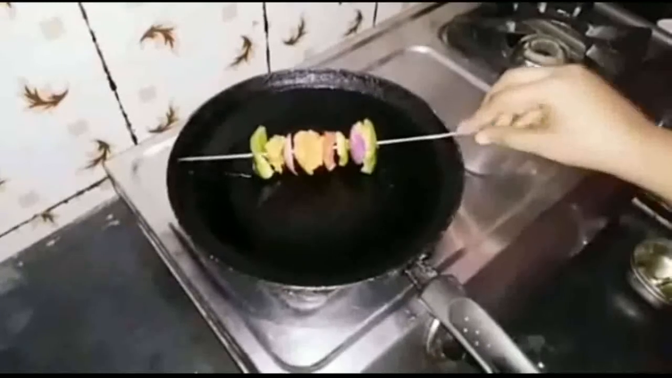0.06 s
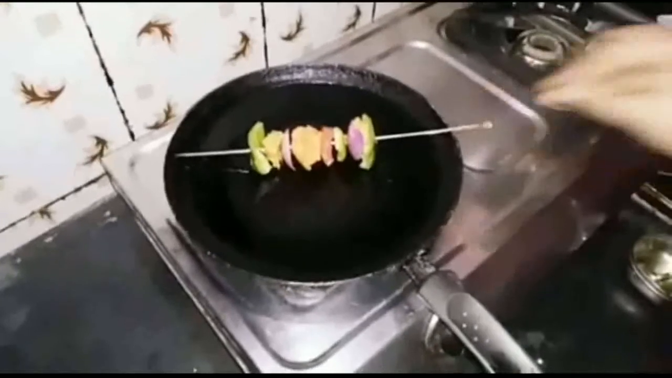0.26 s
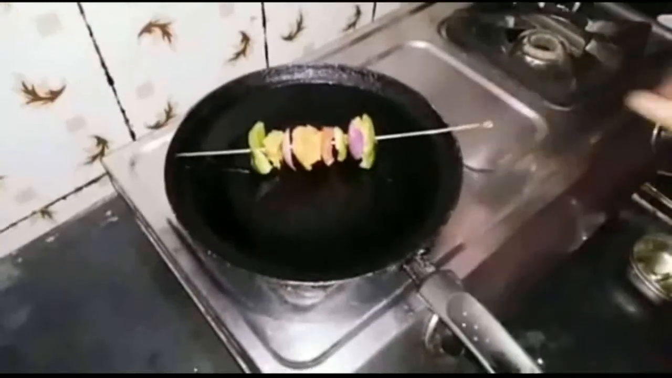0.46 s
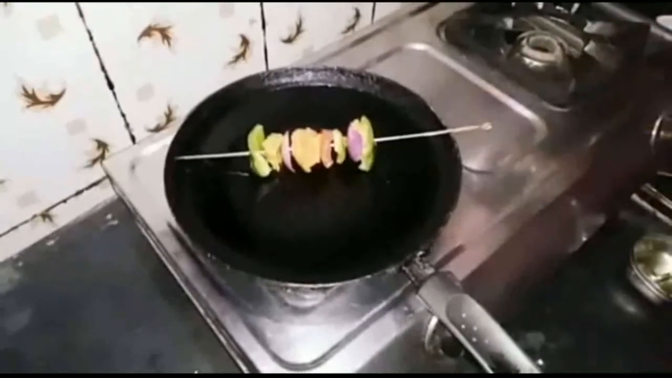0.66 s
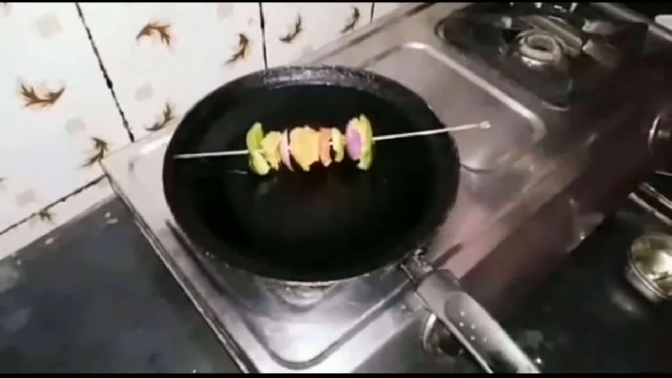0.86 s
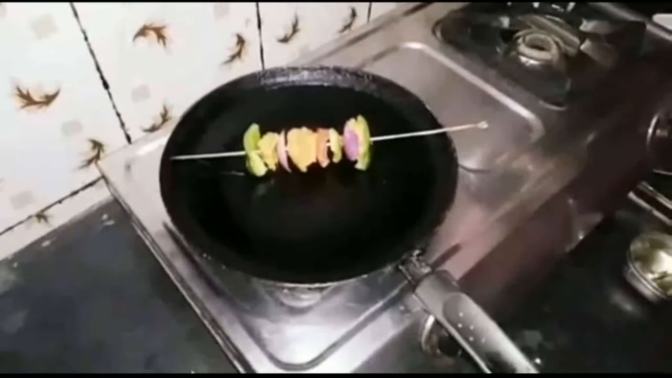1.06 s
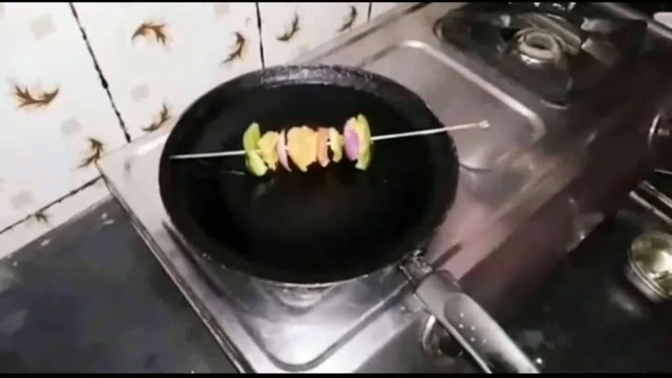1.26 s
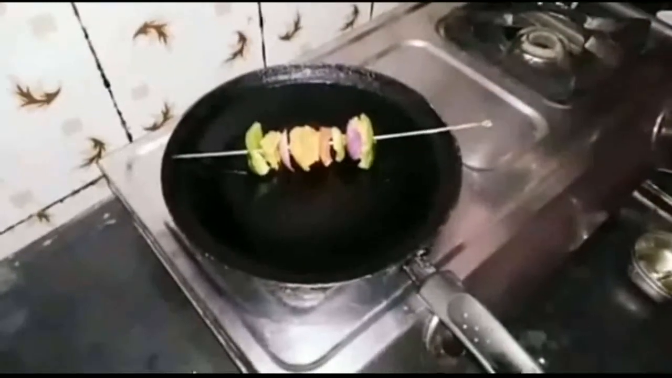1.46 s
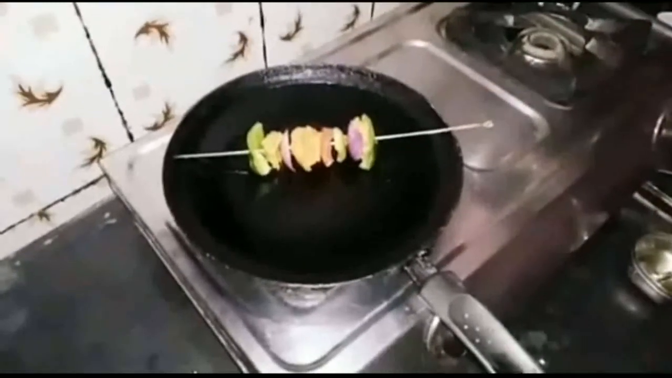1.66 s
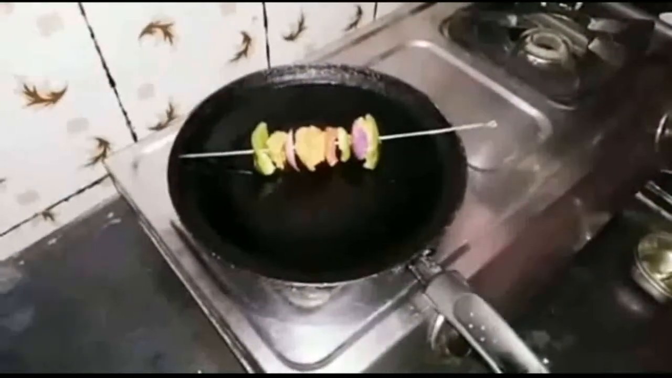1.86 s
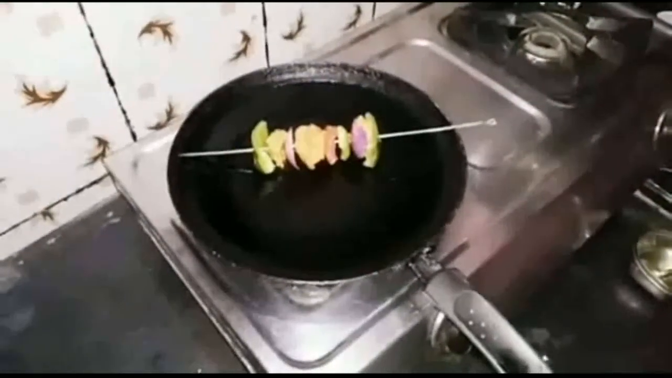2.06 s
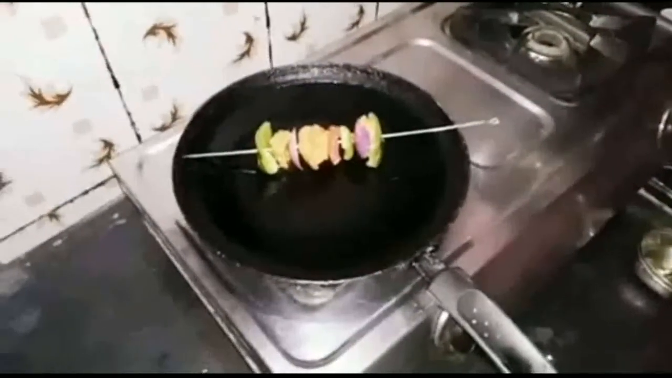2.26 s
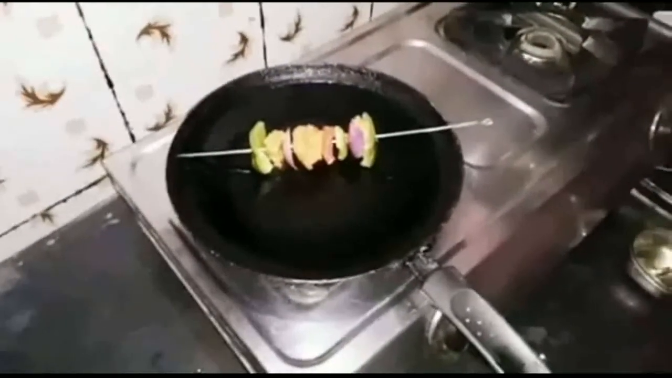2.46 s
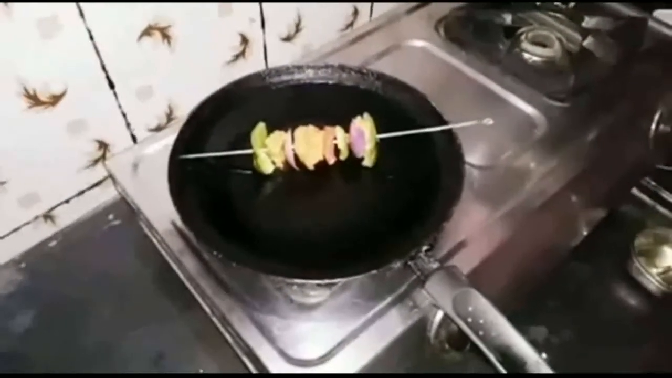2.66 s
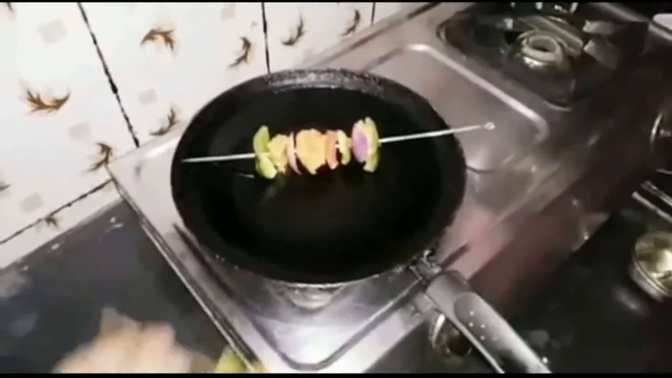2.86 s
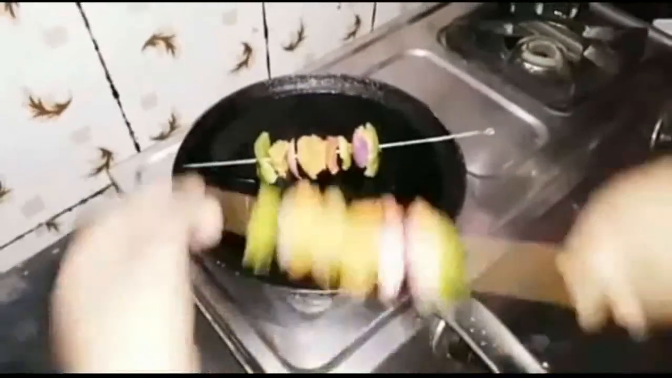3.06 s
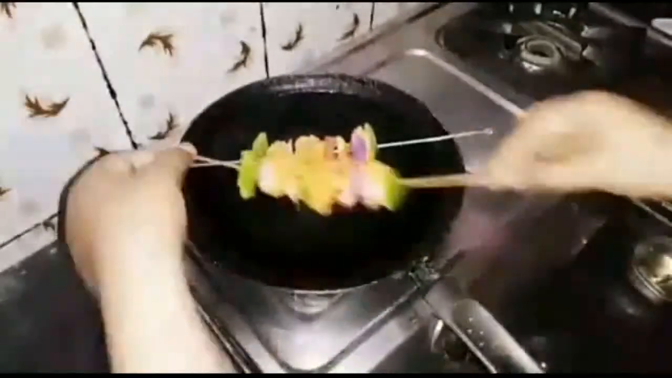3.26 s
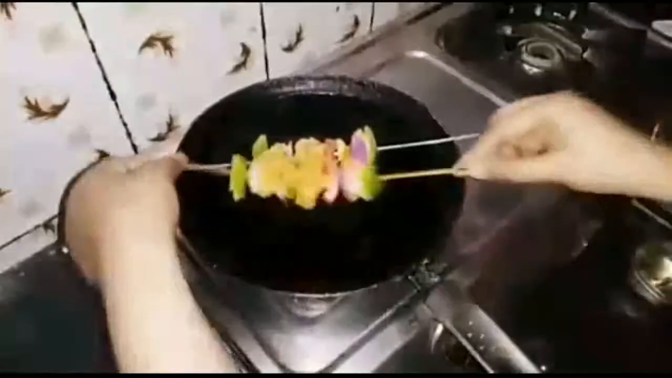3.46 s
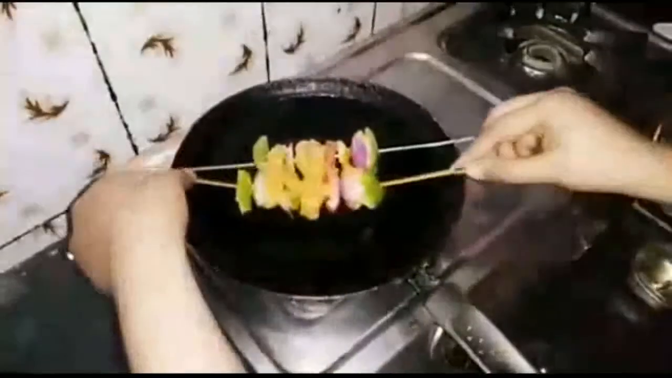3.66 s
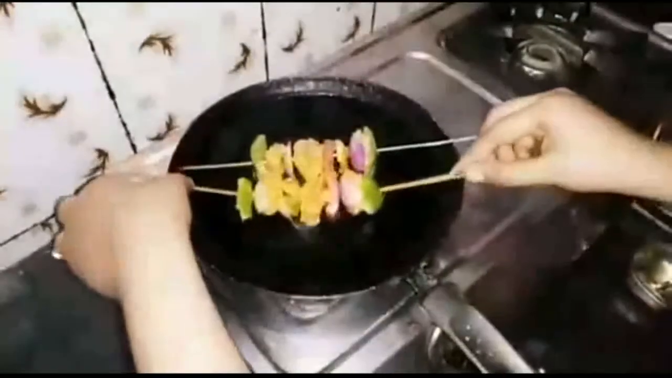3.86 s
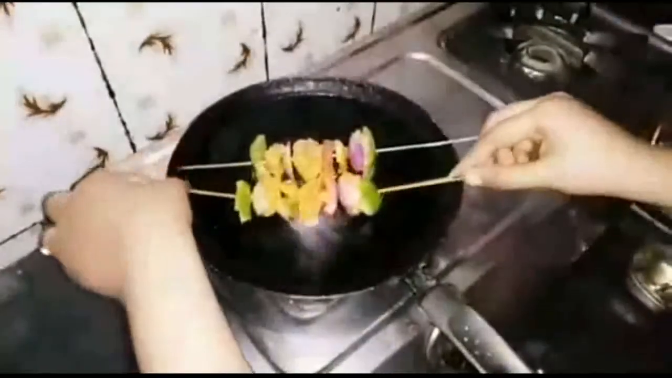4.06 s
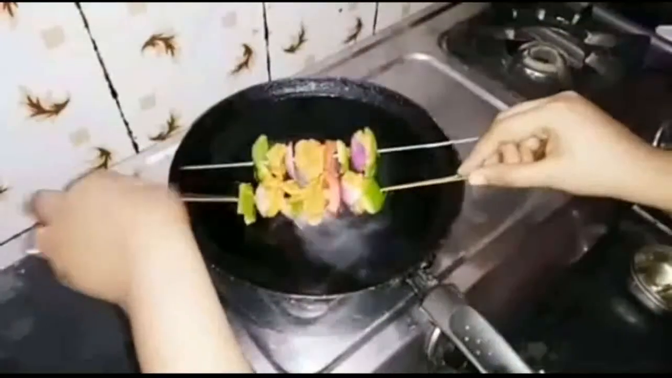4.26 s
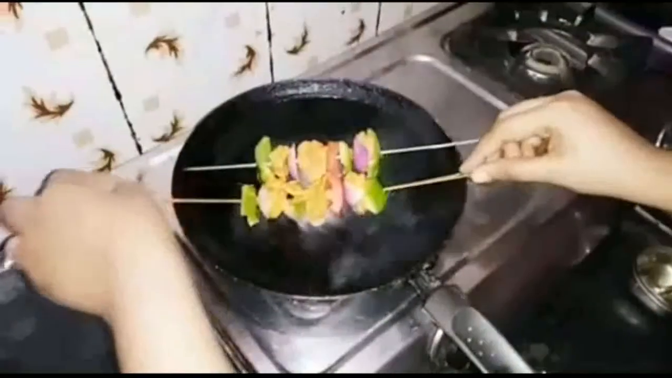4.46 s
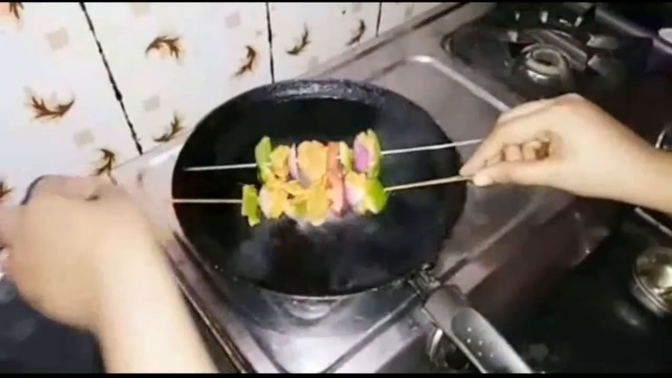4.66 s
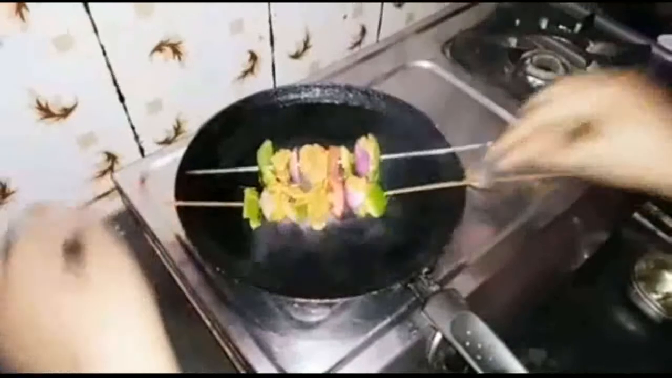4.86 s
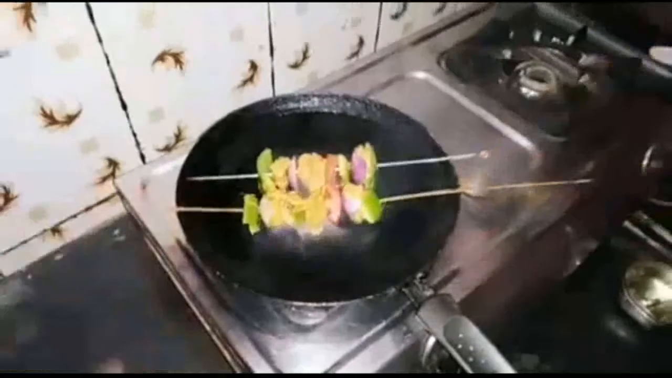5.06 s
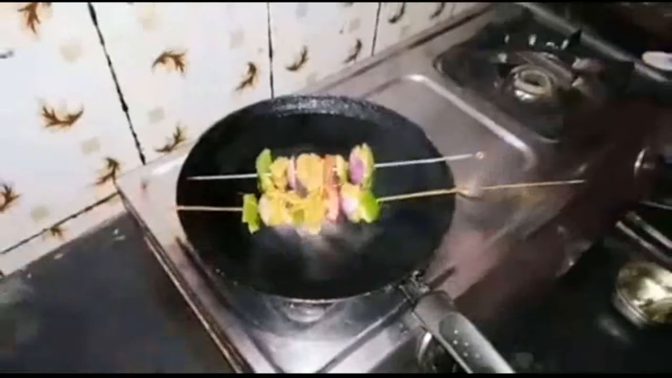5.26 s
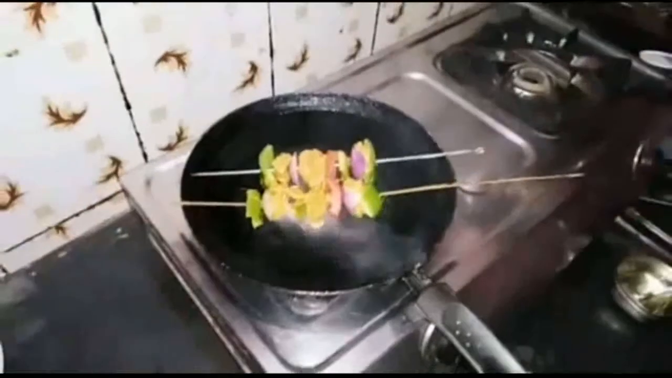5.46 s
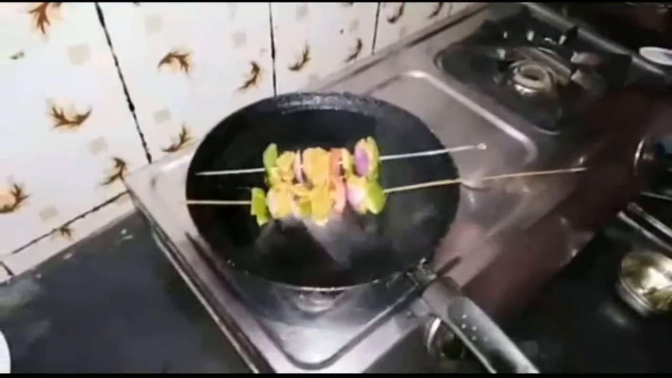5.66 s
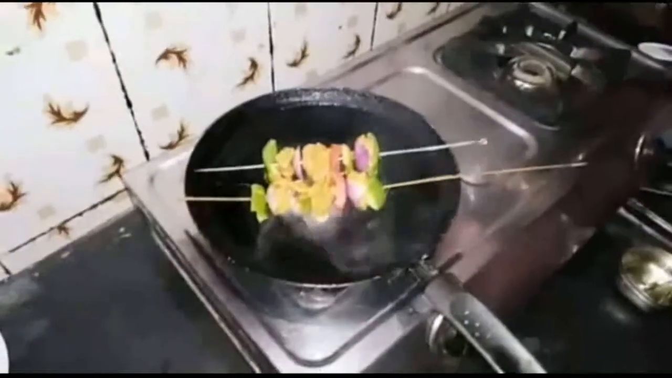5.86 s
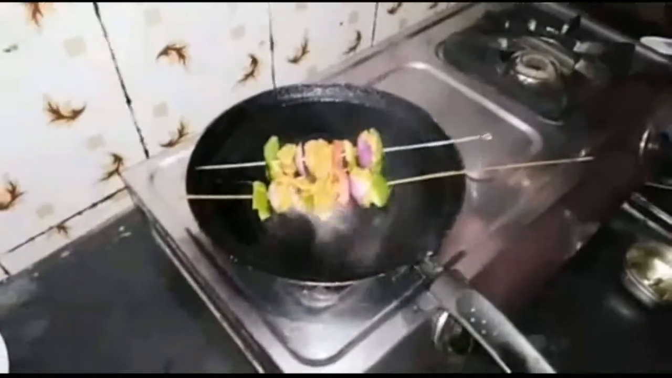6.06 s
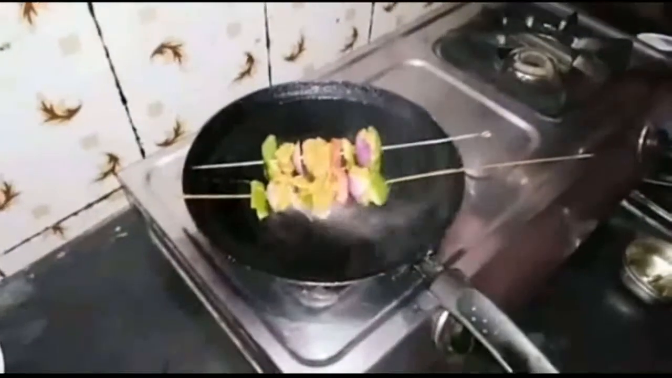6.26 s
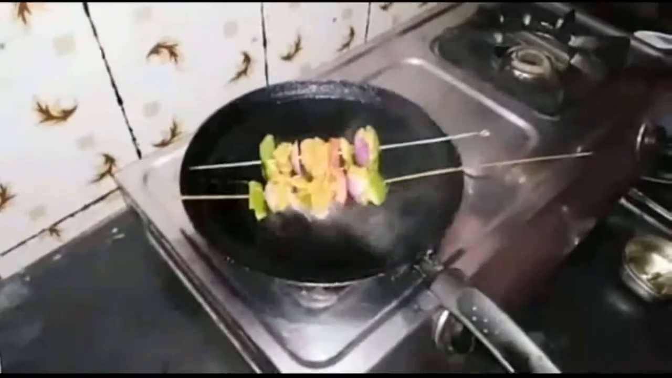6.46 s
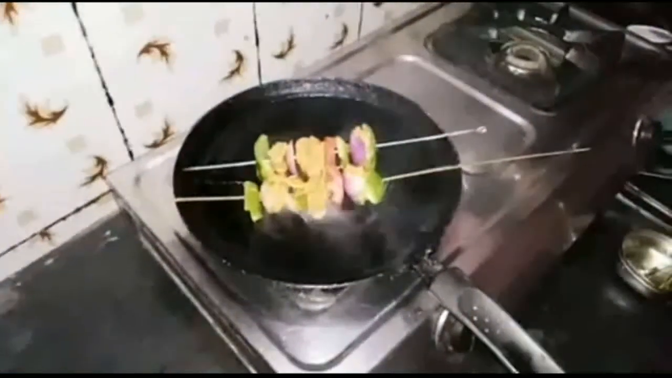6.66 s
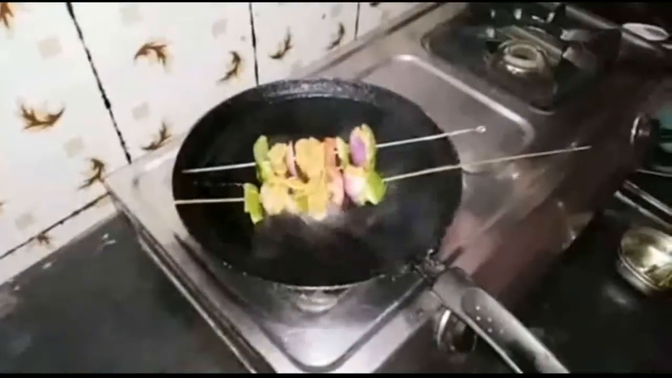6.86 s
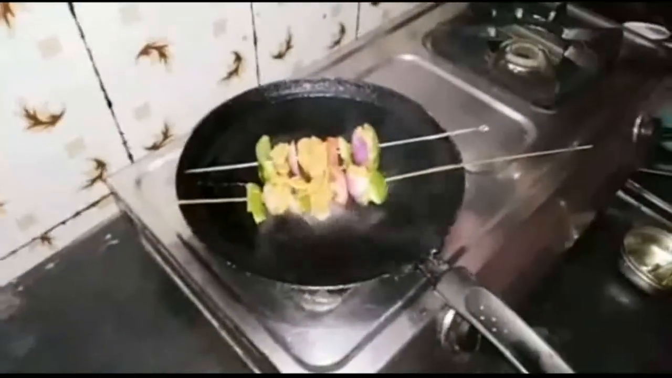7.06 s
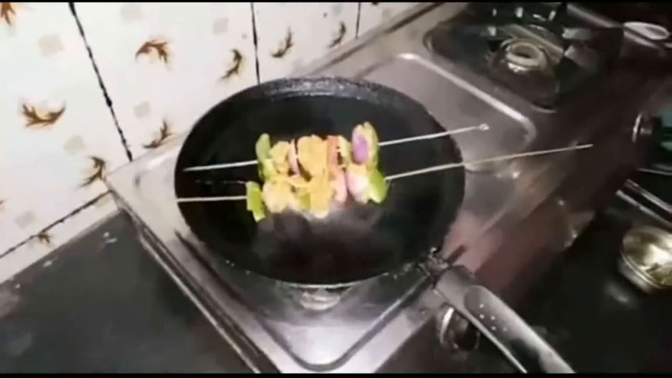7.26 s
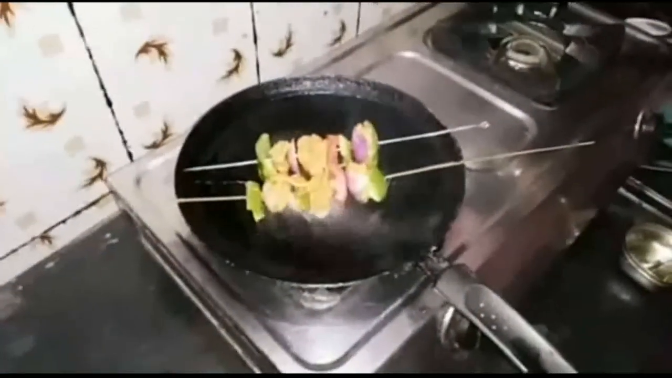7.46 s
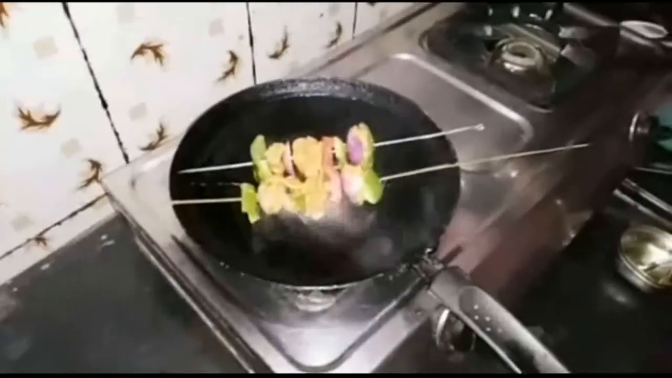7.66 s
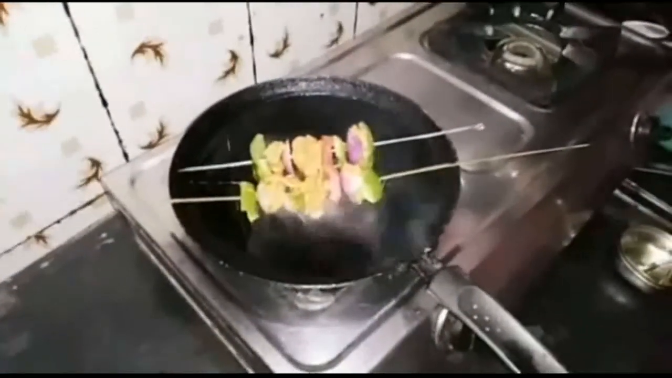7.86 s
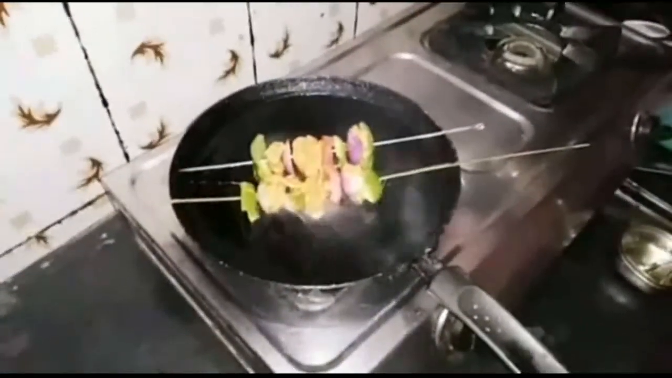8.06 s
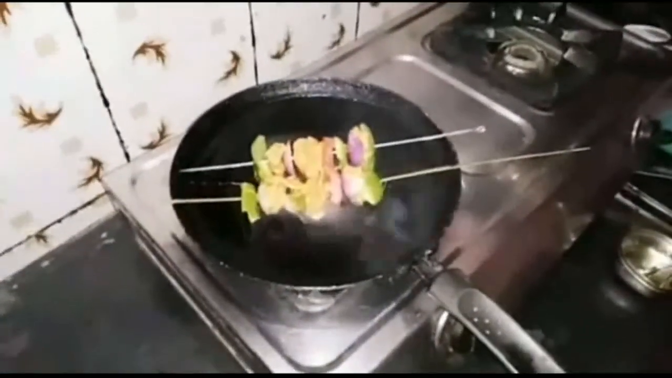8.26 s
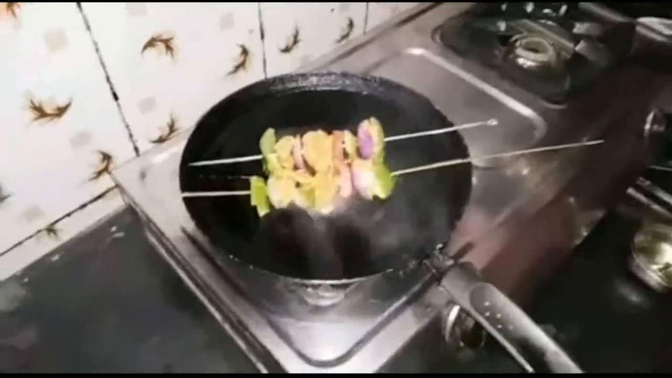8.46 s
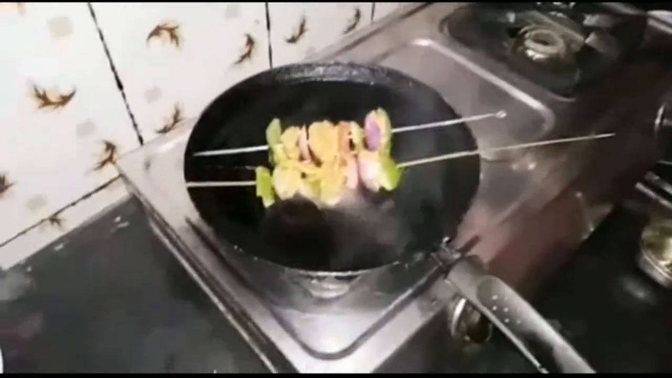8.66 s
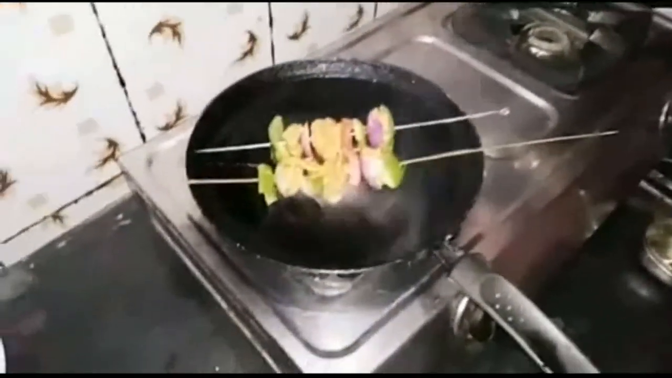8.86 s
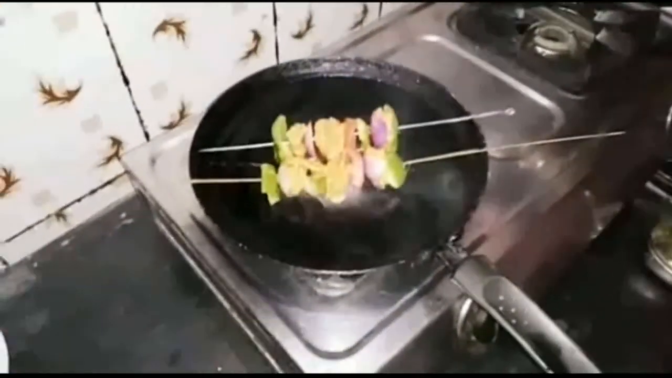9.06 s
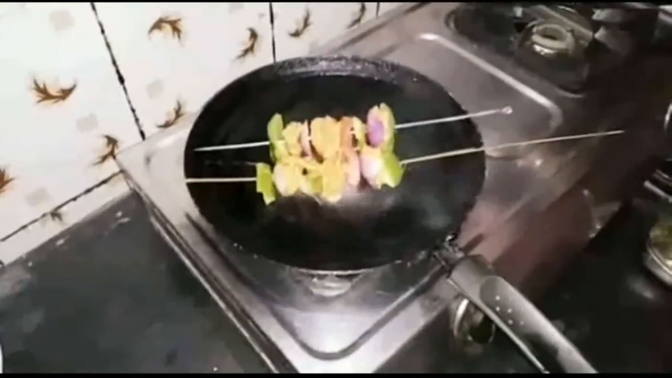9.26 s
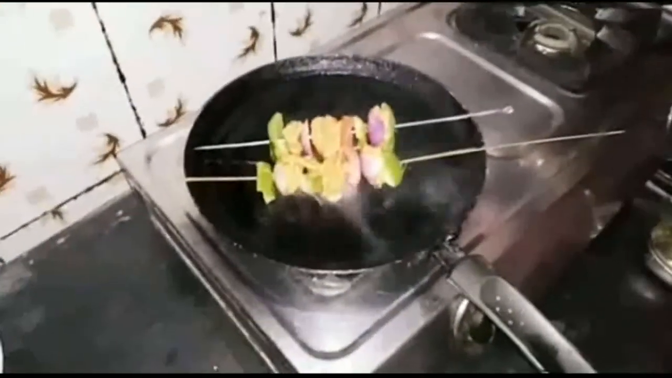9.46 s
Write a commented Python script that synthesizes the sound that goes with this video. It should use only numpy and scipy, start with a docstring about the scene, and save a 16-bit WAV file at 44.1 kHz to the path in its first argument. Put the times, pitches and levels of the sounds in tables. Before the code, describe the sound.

Close view of a pan on a stove in a small tiled kitchen. One skewer crackles with a thin sizzle and frequent sharp oil spits, gradually stronger. Just after three and a half seconds a wet second skewer is laid in; a dense bright hiss flares up, then eases slightly and continues with scattered loud pops. Faint low rumble and a few dull bumps lie underneath.

```python
"""A tiled kitchen: skewers fry in a thin film of hot oil in a pan.
One skewer spits and crackles ever harder; at 3.7 s a second, wet one is laid in and the sizzle swells.
Steam and juice bubbles are short decaying tones, spits are cracks of noise with a ring and a spray of oil.
Under them the stove rumbles faintly, filtered noise with a hollow colour, and a few dull bumps are heard."""
import sys
import numpy as np
from scipy import signal
from scipy.fft import rfft, irfft
from scipy.io import wavfile

SR = 44100
rng = np.random.default_rng(int(sys.argv[2]) if len(sys.argv) > 2 else 0)


def to_wav(s):
    """Save 16-bit WAV."""
    ch = np.atleast_2d(s).T  # columns
    pcm = np.round(np.clip(ch, -1, 1) * 32767)  # PCM
    wavfile.write(sys.argv[1], SR, pcm.astype(np.int16))


N = 418950


def amp(db):
    """Decibels to gain."""
    return 10 ** (np.asarray(db) / 20)


def unit(x):
    """Scales to rms 1."""
    return x / np.sqrt(np.mean(x ** 2) + 1e-20)


def curve(rows):
    """Draws straight lines between (time, value) rows, one value per sample."""
    return np.interp(np.arange(N) / SR, *np.transpose(rows))


def add(mix, s, sound):
    """Mixes a sound in at time s, cut off at the end of the mix."""
    part = mix[max(round(s * SR), 0):][:len(sound)]
    part += sound[:len(part)]


def colour(x, points):
    """Minimum-phase filter through (Hz, dB) points: nothing sounds early, so attacks stay sharp."""
    hz, db = np.transpose(points)
    f = abs(np.fft.fftfreq(8192, 1 / SR))
    gain_db = np.interp(np.log(f + 1), np.log(hz), db)
    log_gain = np.log(amp(gain_db))
    taps = np.fft.ifft(np.exp(np.conj(signal.hilbert(log_gain)))).real
    return signal.oaconvolve(x, taps[:len(taps) // 2])[:N]


def drift(per_s):
    """Slow random wander of rms 1: noise low-passed at per_s Hz."""
    steps = 4096
    f = np.fft.rfftfreq(steps, N / SR / steps)
    slow = irfft(rfft(rng.standard_normal(steps)) / (1 + (f / per_s) ** 4))
    return np.interp(np.arange(N), np.linspace(0, N, steps), unit(slow))


ROOM_T60 = .18  # s


def kitchen(room_db):
    """Response from one spot of the pan: direct sound, echoes off pan and hob, the tail of a tiled room."""
    t = np.arange(SR // 5) / SR
    fade_in = np.clip(t / 0.0023 - .5, 0, 1)
    tail = rng.standard_normal(len(t)) * amp(-60 * t / ROOM_T60) * fade_in
    response = amp(room_db) * tail / np.linalg.norm(tail)
    response[0] = 1
    for delay, gain in zip(rng.uniform(.0003, .0035, size=8), rng.normal(0, .17, size=8)):
        add(response, delay, np.array([gain]))
    return response


def bubble(hz, ring_ms, size=128):
    """A burst bubble rings as a decaying sine; ring_ms is its time constant."""
    t = np.arange(size) / SR
    return np.sin(2 * np.pi * hz * t) * np.exp(-1000 * t / np.maximum(ring_ms, .05))


def bubbles(per_s, spread_db, low_hz, high_hz, cycles, room_db, clump_db, count=10, size=128):
    """Bubbles of all pitches burst at random in several spots of the pan; most are small, a few large."""
    out = np.zeros(N)
    for spot in range(count):
        draws = rng.random((int(per_s * N / SR / count), 4))
        when, pitch, strength, ring = draws.T[:, :, None]
        hz = low_hz + pitch * (high_hz - low_hz)
        rings = bubble(hz, 1000 * cycles * (.15 + ring) / hz, size)
        rings /= np.linalg.norm(rings, axis=1, keepdims=True)
        rings *= amp(spread_db * np.minimum(-np.log(strength), 4))
        at = (when * N).astype(int) + np.arange(size)
        bursts = np.bincount(at.ravel(), rings.ravel(), N)[:N]
        out += signal.oaconvolve(bursts, kitchen(room_db))[:N]
    return unit(out * amp(clump_db * drift(18.5)))


CRACK_MS = .45  # time constant


def crack():
    """A film of oil tears: a quickly dying snap of band-limited noise, peak 1."""
    t = np.arange(128) / SR
    snap = rng.standard_normal(len(t)) * np.exp(-1000 * t / CRACK_MS)
    snap = signal.sosfilt(signal.butter(2, [3600, 9400], "band", fs=SR, output="sos"), snap)
    return snap / abs(snap).max()


# first skewer: level at the start, steady growth until the second is laid in
FIRST_DB, WARMING_DB_PER_S, LAID_IN_S = -54, 3, 3.57
# the first skewer's boil falters now and then: (time [s], half-length [s], level change [dB])
LULLS = [(.08, 0.13, -3), (0.567, 0.03, -3), (0.685, 0.04, -2), (1.6, 0.047, -1), (1.955, 0.036, -3),
         (3.236, 0.018, -3)]
# the second skewer meets the oil, flares up, then settles as its surface dries: (time [s], level [dB])
SECOND_BOIL = [(3.6, -86), (3.68, -47.5), (3.74, -37.5), (3.83, -36), (3.93, -34.5), (4.2, -36.5),
               (4.7, -36), (4.95, -37.5), (5.4, -38.5), (5.9, -40), (6.6, -38), (7.15, -40), (7.3, -36.5),
               (7.6, -39), (7.8, -40), (8.4, -40.5), (8.6, -39.5), (9.5, -38.5)]


def boil():
    """How hard the oil boils under each skewer, as gains: the first warms haltingly, the second flares up."""
    t = np.arange(N) / SR
    coarse = t[::100]
    lull_db = sum(db * np.exp(-((coarse - s) / half) ** 2) for s, half, db in LULLS)
    warming_db = WARMING_DB_PER_S * np.minimum(t, LAID_IN_S)
    first = amp(FIRST_DB + warming_db + np.interp(t, coarse, lull_db))
    second = amp(curve(SECOND_BOIL)) * (t > SECOND_BOIL[0][0])
    return first, second


FLURRY_RISE_S, FLURRY_S = .003, .03  # time constants of rise and decay


def flurries():
    """Gain of the extra sizzle that wells up and dies away after each loud spit, summed as power."""
    power, t = np.zeros(N), np.arange(SR // 2) / SR
    swell = (1 - np.exp(-t / FLURRY_RISE_S)) * np.exp(-t / FLURRY_S)
    for s, db, _, _, flurry_db in SPITS:
        add(power, s, (amp(db + flurry_db) * swell) ** 2)
    return np.sqrt(power)


# colour of the fine sizzle of the first and of the second skewer: (frequency [Hz], gain [dB])
FIRST_SIZZLE_COLOUR = [(800, -64.5), (1450, -61), (1850, -21), (2400, -15.5), (2750, -16.5), (3020, -17),
                       (3500, -9), (4150, -9.5), (4400, -4.5), (5100, -1), (5700, -3.5), (6500, 1.5),
                       (7050, -0.5), (8000, -0.5), (8300, 0), (8650, -2.5), (9400, -5), (12100, -11.5),
                       (13600, -15), (14000, -15)]
SECOND_SIZZLE_COLOUR = [(1100, -78), (2000, -41), (2850, -10), (3100, -15.5), (3750, -2), (4150, -3.5),
                        (4450, 3), (4800, 4), (5150, 1), (5550, 3), (5850, -3), (6450, 3), (7000, 0.5),
                        (7750, 5), (9000, 0), (9650, 0.5), (10900, -5.5), (12500, -5), (13700, -8.5),
                        (14000, -7.5)]


def sizzle():
    """Crackle of tiny bursts over a fine steam hiss; the second skewer's bubbles are denser and brighter."""
    first, second = boil()
    sparse = bubbles(per_s=1100, spread_db=3.5, low_hz=2446, high_hz=13900, cycles=5.3,
                     room_db=3, clump_db=0.5, count=8, size=200)
    dense = bubbles(per_s=1500, spread_db=3.5, low_hz=2400, high_hz=13880, cycles=4.9,
                    room_db=1, clump_db=0.3, count=8, size=200)
    one = colour(sparse + amp(-6) * rng.standard_normal(N), FIRST_SIZZLE_COLOUR)
    two = colour(dense + amp(-1.0) * rng.standard_normal(N), SECOND_SIZZLE_COLOUR)
    return np.hypot(first, flurries()) * unit(one) + second * unit(two)


# rate before clusters are cut out, share of time they fill, how fast they come and go, spread of sizes
TICKS_PER_S, TICK_SHARE, TICK_CLUSTERS_PER_S, TICK_SPREAD_DB = 260, .45, 22, 2.6
# peak of the smallest ticks against the boil of each skewer, before the colouring
TICK_FIRST_DB, TICK_SECOND_DB = 5.5, -4
# the tiny bubble behind a tick: pitch range, longest time constant
TICK_HZ, TICK_RING_MS = (4300, 9000), 0.56
# colour shared by ticks and spits: (frequency [Hz], gain [dB])
SPIT_COLOUR = [(400, -52), (1200, -38), (1650, -9), (2100, -6), (3200, -7), (4500, -.5), (9000, 1),
               (14000, 1)]


def ticks():
    """Tiny droplets crack and ring for an instant, in uneven clusters."""
    first, second = boil()
    level = np.hypot(amp(TICK_FIRST_DB) * first, amp(TICK_SECOND_DB) * second)
    busy = drift(TICK_CLUSTERS_PER_S)
    in_cluster = busy > np.quantile(busy, 1 - TICK_SHARE)
    out = np.zeros(N)
    for when, size, pitch, ring in rng.random((int(TICKS_PER_S * N / SR), 4)):
        at = int(when * N)
        if in_cluster[at]:
            tick = crack() + bubble(np.interp(pitch, [0, 1], TICK_HZ), TICK_RING_MS * ring)
            gain = level[at] * amp(TICK_SPREAD_DB * min(-np.log(size), 2.2))
            add(out, at / SR, gain * tick / abs(tick).max())
    return colour(out, SPIT_COLOUR)


# level of the wet bubbles against the boil of each skewer
WET_FIRST_DB, WET_SECOND_DB = -23.5, -16.5
# colour of the wet bubbles under the first and under the second skewer: (frequency [Hz], gain [dB])
WET_FIRST_COLOUR = [(300, -53.5), (1250, -36.5), (1450, -2), (1680, -10), (1880, 8.5), (2200, 3.5),
                    (2750, 11.5), (3050, 6), (3500, 11.5), (9000, -5.5)]
WET_SECOND_COLOUR = [(300, -35.5), (750, -56), (1080, -35), (1300, -5), (1500, 9), (2200, 8), (3000, 12),
                     (4500, 14), (9000, 4.5)]


def wet_bubbles():
    """Juice boils under the food in larger, lower bubbles that ring longer."""
    first, second = boil()
    pops = bubbles(per_s=1100, spread_db=3.5, low_hz=750, high_hz=3694, cycles=7.2,
                   room_db=4.0, clump_db=1.52, count=10, size=400)
    under_first = amp(WET_FIRST_DB) * first * unit(colour(pops, WET_FIRST_COLOUR))
    under_second = amp(WET_SECOND_DB) * second * unit(colour(pops, WET_SECOND_COLOUR))
    return under_first + under_second


CLUSTER_S, CLUSTER_WIDTH_HZ = .065, 150  # middle length, width of the band its tones fall in
# low tone clusters that follow the first and the second boil: (rate [per s], lowest pitch [Hz],
# highest pitch [Hz], greatest level at the highest pitch, against the boil [dB], gain per octave of pitch [dB])
TONE_CLUSTERS = [(9, 830, 2100, -23, 13.5), (17, 900, 1400, -27.5, 10.5)]


def tone_clusters():
    """Short low tone clusters: four close tones beat under a smooth swell, their level following the boil."""
    out = np.zeros(N)
    for level, (per_s, low_hz, high_hz, db, octave_db) in zip(boil(), TONE_CLUSTERS):
        for when, pitch, length, size, *chance in rng.random((int(per_s * N / SR), 12)):
            hz = low_hz + pitch * (high_hz - low_hz)
            t = np.arange(0, CLUSTER_S * (.6 + .8 * length), 1 / SR)
            tones = np.zeros(len(t))
            for stray, phase in np.reshape(chance, (-1, 2)):
                tone_hz = hz + CLUSTER_WIDTH_HZ * (stray - .5)
                tones += np.sin(2 * np.pi * (tone_hz * t + phase))
            gain_db = db + octave_db * np.log2(hz / high_hz) + 2.7 * (size - 1.0)
            swell = np.sin(np.pi * t / t[-1]) ** 2
            add(out, when * N / SR, level[int(when * N)] * amp(gain_db) * unit(tones * swell))
    return out


# an inverted echo: delay, gain, frequency above which it fades out
HOLLOW_DELAY_S, HOLLOW_GAIN, HOLLOW_TOP_HZ = .0026, .85, 1400


def hollow(x):
    """The inverted echo cuts evenly spaced notches that fade out towards the treble."""
    f = np.fft.rfftfreq(N, 1 / SR)
    echo = HOLLOW_GAIN * np.exp(-2j * np.pi * f * HOLLOW_DELAY_S) / (1 + (f / HOLLOW_TOP_HZ) ** 6)
    return irfft(rfft(x) * (1 - echo), N)


SURGE_DB, SURGES_PER_S = 7, 10  # the rumble surges unevenly: depth, rate
# drone: pitch, rms waver of the pitch, middle peak level against the rumble
DRONE_HZ, DRONE_WAVER_HZ, DRONE_DB = 186, 7.45, -8
DIP_DB = -29
# the rumble dips briefly: (time [s], half-length [s])
DIPS = [(1.84, .025), (3.215, 0.034), (3.744, 0.039), (5.317, .03), (5.914, 0.015), (7.449, 0.043),
        (7.952, 0.025), (8.21, 0.051), (8.636, 0.029), (9.42, 0.079)]
# low rumble before surges and dips: (time [s], level [dB])
RUMBLE = [(0, -78.5), (.8, -69.5), (1.15, -77), (2.1, -73), (3.3, -72), (4.1, -67.5), (4.6, -65),
          (5.03, -59), (5.3, -67.5), (5.5, -66), (5.8, -75), (6.5, -67.5), (6.9, -66), (7.7, -72),
          (8.1, -66), (8.4, -60), (8.8, -73), (9.5, -65.5)]
# colour of the rumble: (frequency [Hz], gain [dB])
RUMBLE_COLOUR = [(15, 7), (35, 9.5), (55, 11.5), (110, 9.5), (160, 4.5), (210, 4), (260, -16), (340, -30.5),
                 (600, -59), (1200, -38)]


def stove():
    """Uneven low rumble of noise with a faint wavering sine drone; both surge and dip together."""
    t = np.arange(N) / SR
    surge = unit(amp(SURGE_DB * np.tanh(drift(SURGES_PER_S))))
    dips = amp(DIP_DB * sum(np.exp(-((t - s) / half) ** 4) for s, half in DIPS))
    drone_hz = DRONE_HZ + DRONE_WAVER_HZ * drift(20)
    drone_gain = amp(DRONE_DB + 7 * np.tanh(drift(9)))
    drone = drone_gain * np.sin(2 * np.pi * np.cumsum(drone_hz) / SR)
    rumble = unit(hollow(colour(rng.standard_normal(N), RUMBLE_COLOUR)))
    return amp(curve(RUMBLE)) * surge * dips * (rumble + drone)


# broad murmur of the burner: (time [s], level [dB])
MURMUR = [(0, -72.5), (.6, -83.5), (1.8, -74), (3.6, -76), (4.2, -100), (5.5, -100)]
# colour of the murmur: (frequency [Hz], gain [dB])
MURMUR_COLOUR = [(150, -17), (280, 2), (420, -9), (580, 13), (690, 2.5), (800, -21.5), (1100, -38.5)]


def murmur(patchy_db=9, count=5):
    """The burner's broad murmur: noise split into bands that each flutter on their own."""
    noise, out = colour(rng.standard_normal(N), MURMUR_COLOUR), np.zeros(N)
    edges = np.linspace(200, 850, count + 1)
    for band in zip(edges, edges[1:]):
        part = signal.sosfilt(signal.butter(2, band, "band", fs=SR, output="sos"), noise)
        out += part * amp(patchy_db * np.tanh(drift(15.3)))
    return amp(curve(MURMUR)) * unit(out)


# rate, peak of the smallest against the boil, spread of sizes, pitch range
SMALL_SPITS_PER_S, SMALL_SPIT_DB, SMALL_SPREAD_DB, SMALL_SPIT_HZ = 7, 4.5, 2, (4900, 8400)


def small_spits(ring_ms=0.24):
    """Random rows of lesser spits, which grow as the oil boils harder."""
    when, pitch, ring, strength = rng.random((int(SMALL_SPITS_PER_S * N / SR), 4)).T
    boil_db = 20 * np.log10(np.hypot(*boil())[(when * N).astype(int)])
    db = boil_db + SMALL_SPIT_DB + SMALL_SPREAD_DB * np.minimum(-np.log(strength), 2)
    hz = np.interp(pitch, [0, 1], SMALL_SPIT_HZ)
    return list(zip(when * N / SR, db, hz, ring_ms * (.5 + ring)))


SPRAY_DB, SPRAY_T60 = -15, .005  # spray of oil: starting level against the burst, decay (s)
RING_DB, SPIT_ROOM_DB = 4, 0  # ringing bubble against the crack, room tail of the cracks
# loud spits of oil, before the colouring: (time [s], peak [dB], bubble pitch [Hz],
# ring time constant [ms], flurry of sizzle against the peak, before its rise and decay [dB])
SPITS = [(0.038, -34.5, 7400, 0.94, -36), (.1003, -42, 8300, .3, -31), (.1745, -35.5, 7300, 0.3, -21),
         (.1875, -33, 7800, 0.35, -31), (.2608, -35, 7000, 0.58, -30), (0.2879, -30.5, 6500, 0.29, -14),
         (.367, -37.5, 7500, .3, -8.5), (0.4392, -34, 6200, 0.7, -33), (.458, -30.5, 5240, 0.94, -29),
         (.6068, -36.5, 8100, .7, -36), (0.6258, -34, 6600, .6, -28), (0.7422, -31.5, 4900, 0.16, -35),
         (.8225, -27, 7100, 0.055, -20), (.839, -33, 7950, 0.34, -26), (0.8796, -31, 5800, 0.44, -24),
         (.9243, -33.5, 5300, 0.55, -15.5), (1.054, -33, 6200, 0.78, -18), (1.1005, -39, 8000, .4, -14),
         (1.1483, -34.5, 5700, 0.56, -17), (1.211, -35, 6470, 1, -26), (1.2585, -40, 6500, .4, -22),
         (1.317, -36.5, 7900, 0.71, -8.5), (1.3526, -32.5, 5240, 0.73, -28),
         (1.3873, -29.5, 6300, 0.36, -30), (1.4305, -35, 7140, .6, -15), (1.444, -33, 6500, .5, -14),
         (1.4601, -31, 6700, 0.57, -35), (1.6643, -36, 7000, .3, -20), (1.719, -30.5, 7200, 0.36, -10),
         (1.8744, -30, 6560, 0.1, -16), (1.897, -30, 8000, .3, -21), (1.9246, -28, 7500, .08, -35),
         (1.998, -31, 6550, 0.2, -20), (2.0506, -35, 7400, 0.65, -13), (2.1136, -33, 8300, 0.25, -17),
         (2.167, -40, 6430, 0.25, -35), (2.336, -38, 7500, .3, -23), (2.466, -31, 5530, 0.89, -18),
         (2.488, -39, 6000, .2, -28), (2.5425, -25, 5040, 0.79, -12), (2.598, -26.5, 6500, 0.87, -18),
         (2.7317, -28, 5060, .6, -15), (2.7428, -26.5, 6000, 0.35, -31), (2.82, -17.5, 6500, 0.11, -26),
         (2.9377, -32, 6200, .6, -13), (3.0756, -30, 6150, 1, -34), (3.1097, -38, 6500, 0.91, -33),
         (3.1512, -34, 6270, 0.18, -18), (3.1685, -28, 6060, 0.61, -16), (3.182, -30.5, 5500, .2, -24),
         (3.3374, -26, 4830, 0.61, -26), (3.348, -28.5, 5700, 0.68, -26), (3.3892, -37, 5230, .6, -30),
         (3.4655, -37, 7900, .5, -8), (3.5324, -34, 6200, .5, -6), (3.7348, -22, 7620, .4, -24),
         (4.528, -22, 6350, 0.18, -32), (4.858, -23, 6000, 0.061, -32), (4.8897, -21, 4940, 0.35, -28),
         (5.054, -20, 5900, 0.26, -18), (5.3158, -21.5, 6400, .2, -18), (7.076, -22, 5530, 0.071, -34),
         (7.2457, -21.5, 8300, 0.13, -28), (7.2805, -25, 7440, 0.12, -33), (7.3135, -27, 7000, .2, -32),
         (7.3271, -19, 4750, 0.25, -31), (7.6247, -27, 6430, .4, -9), (7.6753, -21, 7900, 0.26, -18),
         (7.8738, -20, 4560, 0.68, -33), (8.1943, -23, 4800, 0.55, -15), (8.4843, -20.5, 4700, 0.14, -33),
         (8.517, -24.5, 7700, 0.17, -18), (8.8318, -26, 7000, 0.099, -32), (8.8518, -22, 5950, 0.072, -36),
         (9.049, -30, 6400, 0.17, -30), (9.229, -22, 7800, .3, -28.5), (9.2584, -19.5, 4670, 0.43, -33)]


def spits():
    """A water drop bursts: a crack, a briefly ringing bubble, a spray of oil; the room returns the cracks."""
    out, cracks, t = np.zeros(N), np.zeros(N), np.arange(600) / SR
    for s, db, hz, ring_ms in [row[:4] for row in SPITS] + small_spits():
        spray = amp(SPRAY_DB - 60 * t / SPRAY_T60) * rng.standard_normal(len(t))
        spray[0] = 1  # the burst itself
        ring = signal.fftconvolve(spray, bubble(hz, ring_ms))
        snap = crack()
        pop = amp(RING_DB) * ring / abs(ring).max()
        add(pop, 0, snap)
        start = s + .0008
        add(out, start, amp(db) * pop / abs(pop).max())
        add(cracks, start, amp(db) * snap)
    echo = signal.oaconvolve(cracks, kitchen(SPIT_ROOM_DB))[:N] - cracks
    return colour(out + echo, SPIT_COLOUR)


# soft bumps and shuffles: (time [s], noise level before rise and decay [dB], centre [Hz],
# decay by 60 dB [s], rise time constant [s])
BUMPS = [(0.755, -49, 75.4, 0.19, 0.01), (.78, -53, 190, 0.19, .008), (2.741, -68, 200, 0.035, .002),
         (2.74, -59, 1500, 0.086, .002), (2.818, -46, 900, 0.019, .0007), (2.813, -50, 230, .02, .001),
         (2.817, -54, 520, .016, .001), (2.82, -55, 1630, 0.058, 0.0013), (3.579, -67, 380, .12, 0.013),
         (4.849, -57, 262, 0.083, 0.0047), (8.125, -67, 396, 0.092, .012), (8.475, -47, 1090, 0.12, .015),
         (8.491, -55, 334, 0.15, 0.02), (8.565, -59, 372, 0.11, 0.02), (9.05, -59, 430, 0.095, .012),
         (9.38, -52, 560, 0.16, .02), (9.42, -50, 800, 0.079, 0.008), (9.44, -53.5, 403, 0.16, .015)]


def bumps():
    """Dull, quickly dying knocks and softer shuffles: narrow bands of decaying noise."""
    out, t = np.zeros(N), np.arange(SR // 3) / SR
    for s, db, hz, t60, rise in BUMPS:
        band = signal.butter(4, [hz / 1.22, hz * 1.23], "band", fs=SR, output="sos")
        body = unit(signal.sosfilt(band, rng.standard_normal(len(t))))
        envelope = amp(-60 * t / t60) * (1 - np.exp(-t / rise))
        add(out, s, amp(db) * body * envelope)
    return out


SEAR_DB, SEAR_FROM_DB = -26, -36.8  # level against the boil, boil level at which it sets in
# colour of the sear: (frequency [Hz], gain [dB])
SEAR_COLOUR = [(620, -46.5), (780, -8.5), (880, 2.5), (1250, 3.5), (1500, -13), (2000, -42)]


def sear():
    """Wet food on hot metal fries with low, dense bubbles, only while the second skewer boils hardest."""
    _, second = boil()
    wet = 1 / (1 + (amp(SEAR_FROM_DB) / (second + 1e-6)) ** 16)  # steep gate, 0 to 1
    pops = bubbles(per_s=400, spread_db=2, low_hz=700, high_hz=1500, cycles=5,
                   room_db=-6, clump_db=3, count=3, size=900)
    return amp(SEAR_DB) * second * wet * unit(colour(pops, SEAR_COLOUR))


NOISE_EDGE_S = .03  # time to swell and to fade
# when the faint narrow-band noise is heard: (start [s], length [s], level [dB])
FAINT_NOISE = [(3.777, 0.055, -71), (3.88, 0.21, -67.5), (4.15, 0.42, -71.5), (4.69, 0.11, -84),
               (4.873, 0.27, -72.5), (5.203, 0.31, -70), (5.716, 0.06, -74), (5.91, 0.067, -73),
               (6.4, 0.16, -74.5), (6.593, 0.09, -72), (6.854, 0.074, -76), (7.074, 0.16, -69.5),
               (7.397, .07, -68.5), (7.662, 0.12, -69), (8.657, .08, -84), (8.904, 0.32, -71),
               (9.27, 0.24, -70)]
# its colour, strongest near 590 Hz: (frequency [Hz], gain [dB])
FAINT_NOISE_COLOUR = [(380, -48), (450, -27), (520, -2.5), (590, 10), (670, -4.5), (730, -26), (800, -45)]


def faint_noise():
    """Faint narrow-band noise near 590 Hz that comes and goes."""
    level = np.zeros(N)
    for s, length, db in FAINT_NOISE:
        t = np.arange(0, length, 1 / SR)
        to_edge = np.minimum(t, length - t)
        add(level, s, amp(db) * np.sin(np.pi / 2 * np.minimum(to_edge / NOISE_EDGE_S, 1)) ** 2)
    return level * unit(colour(rng.standard_normal(N), FAINT_NOISE_COLOUR))


def scene():
    """Mixes the frying pan, the stove and the faint noises to one channel."""
    frying = sizzle() + ticks() + wet_bubbles() + spits() + sear()
    return (frying + tone_clusters() + stove() + murmur() + bumps() + faint_noise())[None]


EDGE_HZ = 14000


def record(dry):
    """The recorder's band limit: a steep low-pass."""
    low_pass = signal.firwin(511, EDGE_HZ, window=("kaiser", 9), fs=SR)
    return signal.oaconvolve(dry, low_pass[None], "same")


dry = scene()
out = record(dry)
to_wav(out)
```